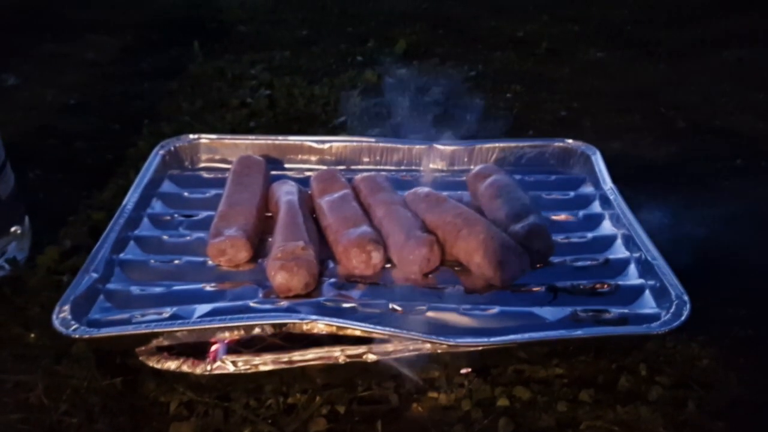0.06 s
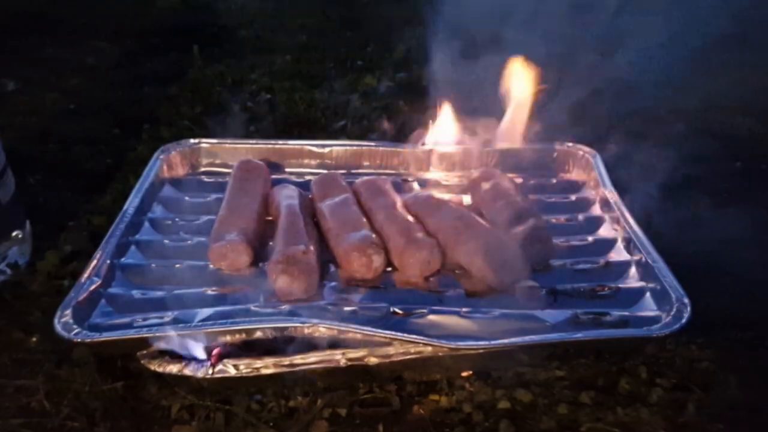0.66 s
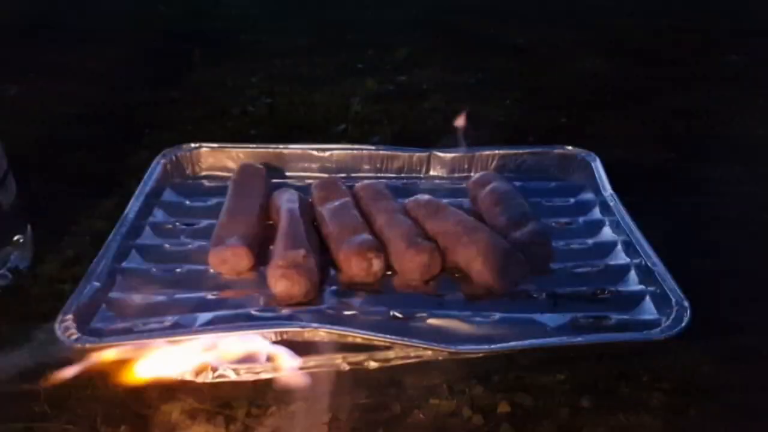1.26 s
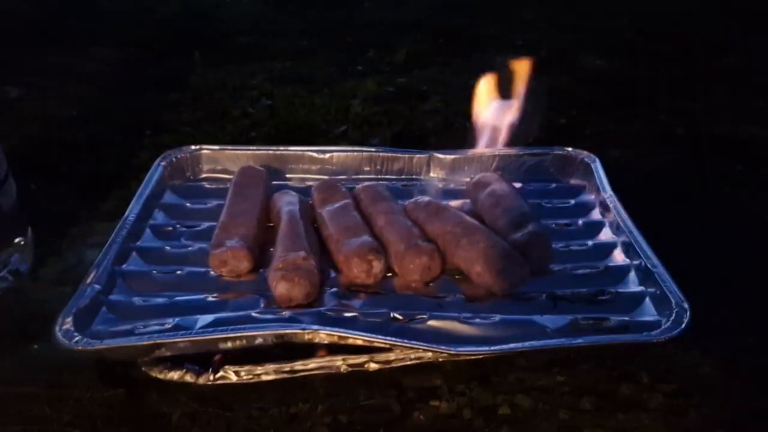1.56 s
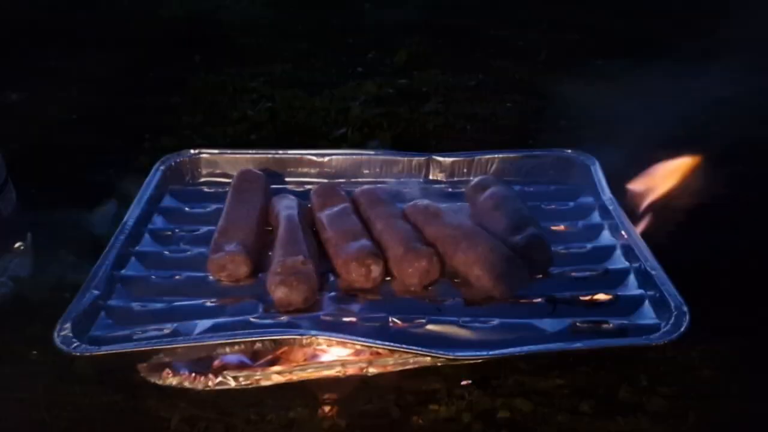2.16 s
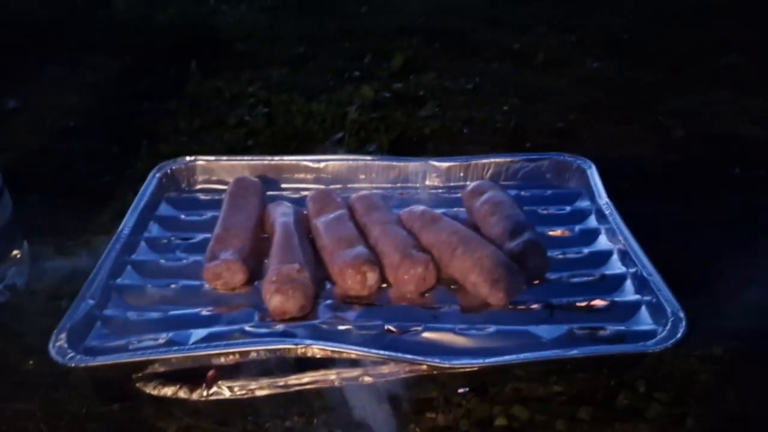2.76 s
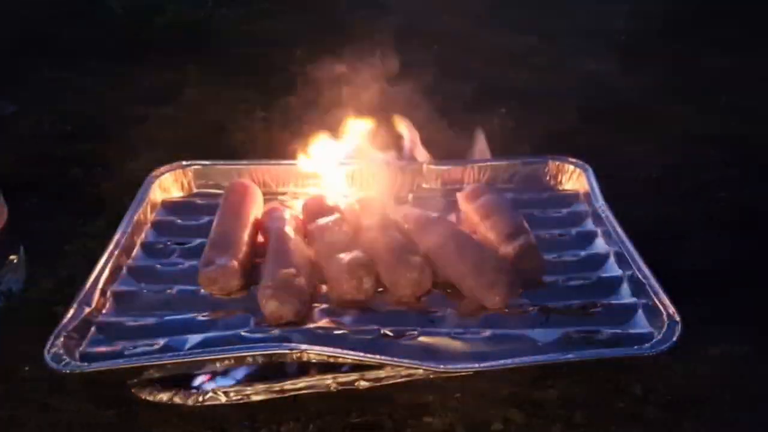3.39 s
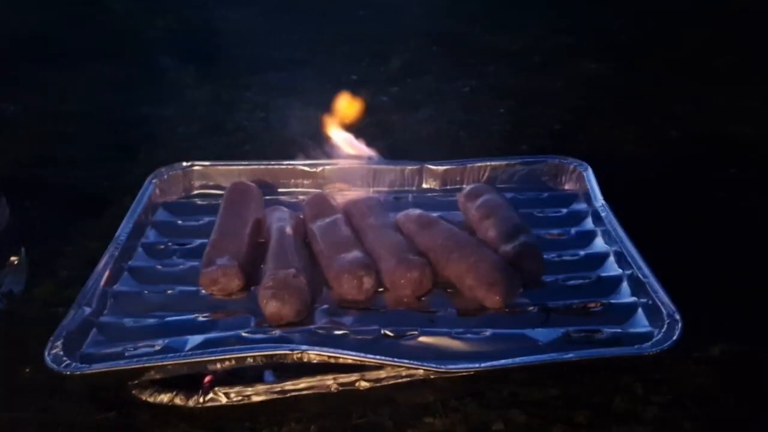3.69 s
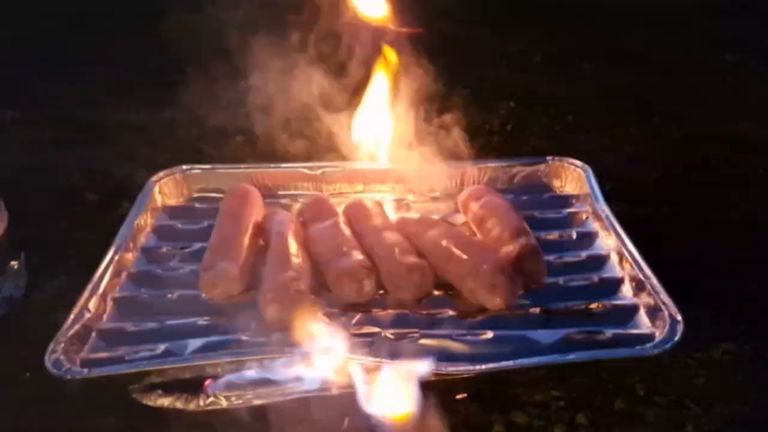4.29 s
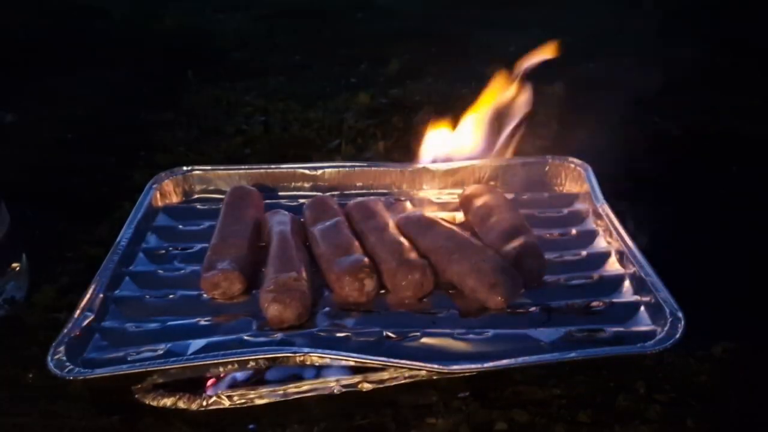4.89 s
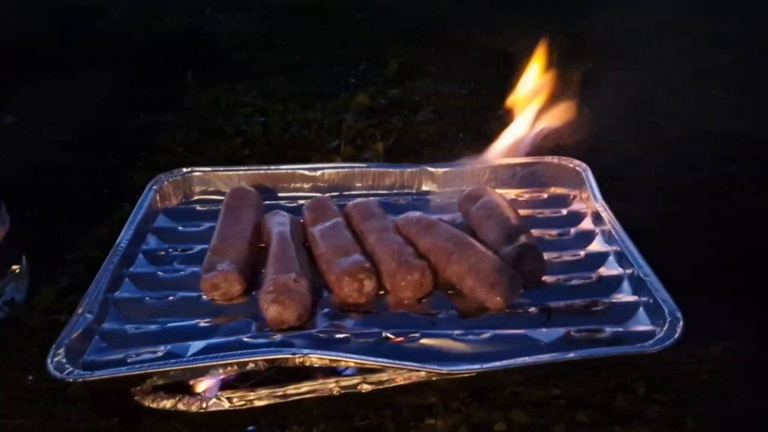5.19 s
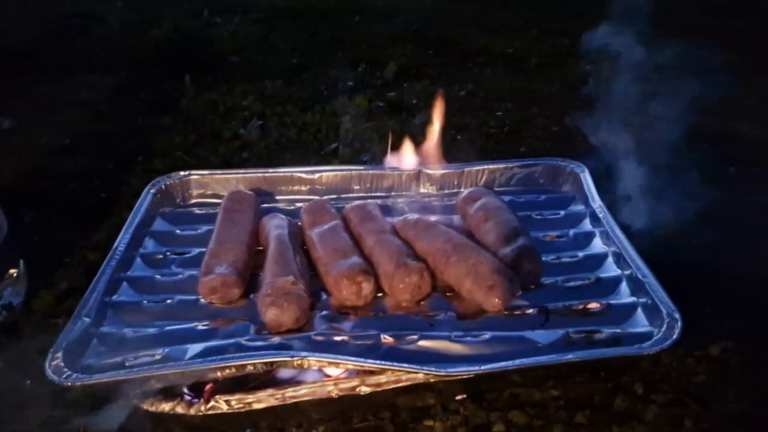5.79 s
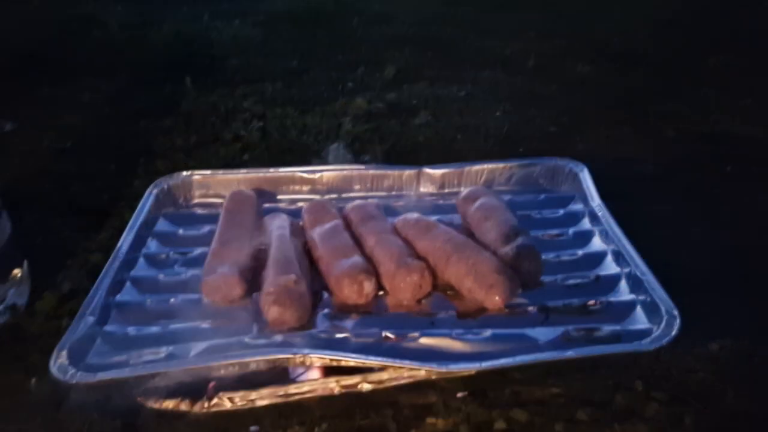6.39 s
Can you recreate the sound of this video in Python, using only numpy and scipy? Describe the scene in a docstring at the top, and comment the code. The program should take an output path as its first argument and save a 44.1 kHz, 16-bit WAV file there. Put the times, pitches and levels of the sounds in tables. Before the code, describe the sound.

Sausages sizzle on a thin foil tray over an open fire outdoors, close by and a little to the left. The fine, bright fizz runs throughout, full of tiny spits and scattered sharper pops that ring briefly off the foil, with clear ones at about 1 and 1.5 seconds. Underneath, the flames rumble, flutter and give soft low puffs, and the burning fuel cracks dryly now and then, most clearly near 0.4, 3 and 5 seconds. The biggest flare whooshes up briefly at about 1.9 seconds. The strongest puff comes at 3.4 seconds, followed by a run of smaller puffs and flaps. From 5 seconds the fat sizzles hardest, with the loudest pop at 5.5 seconds and a few more bright snaps and low puffs before the end at about 6.6 seconds.

```python
"""Sausages sizzle on a foil tray over an open fire, outdoors, close by and a little to the left.
From the start, tiny steam bubbles burst in the fat and ring the foil; now and then a big one pops.
Below, fat feeds the flames, which rumble, puff and flap, and the fuel cracks. The biggest flare
whooshes up at 1.9 s, the strongest puff comes at 3.4 s. From 5 s the fat boils hardest,
with the loudest pop at 5.5 s."""
import sys
import numpy as np
from scipy import signal
from scipy.fft import rfft, irfft, next_fast_len
from scipy.io import wavfile
from scipy.ndimage import uniform_filter1d, map_coordinates

SR = 44100
rng = np.random.default_rng(int(sys.argv[2]) if len(sys.argv) > 2 else 0)


def wav_out(sig):
    """Save sig, one row per channel (or a flat mono array), as 16-bit PCM at SR to the path in sys.argv[1]."""
    wavfile.write(sys.argv[1], SR, np.round(np.clip(np.atleast_2d(sig).T, -1, 1) * 32767).astype(np.int16))


N = 293265

# how hard the fat boils: time_s, level_db
BOIL_CURVE = [(0.0, -58.5), (0.56, -54), (0.7, -56.5), (0.84, -55.5), (1.4, -55), (1.82, -56),
              (2.04, -53.5), (2.5, -53.5), (3.12, -56), (3.36, -52), (3.49, -51.5), (3.54, -56),
              (3.63, -56), (3.8, -52), (4.3, -53.5), (4.48, -52.5), (4.7, -57), (4.96, -55), (5.05, -51),
              (5.3, -50.5), (5.58, -52), (5.8, -50.5), (6.42, -51), (6.54, -50.5), (6.64, -51)]
# strength of the fire: time_s, level_db
FIRE_CURVE = [(0.0, -46), (0.22, -52), (1.1, -47), (1.42, -47.5), (1.54, -55.5), (1.96, -52), (2.25, -49),
              (2.44, -56), (2.74, -45.5), (3.0, -56), (3.38, -45), (3.85, -47.5), (4.22, -49.5),
              (4.48, -48), (5.2, -47.5), (5.3, -52.5), (5.62, -50), (6.05, -48), (6.32, -48.5), (6.64, -51)]
# resonances of the tray's middle and the gap under it: centre_hz, width_hz, lift_db
TRAY_MODES = [(685.3, 175, 18), (800, 50, -6.5), (880, 78, 9), (1017, 80, 8), (1414, 520, 8.5),
              (1754, 170, -7), (2180, 60, 5.5), (2820, 400, 11.5), (3590, 370, 6), (4400, 77, 0),
              (6180, 330, 3), (7420, 520, 10), (8840, 860, 11.5), (9640, 350, 12)]
# resonances of the thin foil where the fat runs: centre_hz, width_hz, lift_db
FOIL_MODES = [(2570, 260, 8.5), (3660, 350, 9), (4140, 370, 4), (4430, 370, 4.5), (5620, 580, 8.5),
              (6440, 400, 4), (7480, 1000, 5.5), (9200, 1300, 5), (10300, 330, 4.5), (11650, 400, 5),
              (12600, 600, 1.5), (13900, 220, 1), (14500, 440, 2)]
# spectrum of fine bubbles: freq_hz, level_db
FIZZ_SPECTRUM = [(800, -37), (2500, -9), (4500, -3.5), (7000, -3.5), (10500, -4), (13000, 1), (15800, 0.5)]
RISE_SHARE = 0.21  # a pop's attack over its length
TOP_HZ = 15850


def sizzle():
    """Coarse bubbles simmer under the sausages, fine ones fizz on the hot foil, both in spurts."""
    # how hard the juice simmers: time_s, level_db
    juice_curve = [(0.0, -51.5), (0.27, -54.5), (0.55, -52.5), (0.72, -56), (0.95, -51.5), (1.4, -56),
                   (1.6, -54), (2.1, -52.5), (2.5, -52.5), (2.8, -52.5), (3.15, -51.5), (3.42, -51),
                   (3.65, -55.5), (4.6, -53.5), (4.92, -52), (5.5, -52), (6.64, -50.5)]
    # coarse bubbles: freq_hz, level_db
    simmer_spectrum = [(200, -49), (450, -13.5), (700, -10.5), (1200, -10), (1750, 5), (2300, -1),
                       (4000, 1.5), (6000, 2), (8500, -8.5), (15000, -24)]
    spurts_db = .5 * wobble(40)
    simmer_db = -51 + swing(juice_curve) + 0.23 * wobble(24) + spurts_db
    fizz_db = -47 + 1.31 * swing(BOIL_CURVE) + 0.59 * wobble(6.6) + spurts_db
    simmer = bubbles(simmer_spectrum, TRAY_MODES, 1200, spread_db=8.5, scatter_s=0.0092, alike_hz=2200)
    fizz = bubbles(FIZZ_SPECTRUM, FOIL_MODES, 2000, spread_db=4.0, scatter_s=0.002, alike_hz=1980)
    simmer = wander(simmer, patchy_db=2.26)
    fizz = wander(fizz, patchy_db=1.6) + amp(-12) * spits()
    return amp(simmer_db) * simmer + amp(fizz_db) * fizz


def bubbles(spectrum, modes, per_second, spread_db, scatter_s, alike_hz):
    """Random bursts of uneven size, each a brief scatter off the crinkled foil."""
    size = amp(spread_db * np.minimum(rng.standard_normal(N), 2.4))
    bursts = (rng.random(N) < per_second / SR) * size
    t = np.arange(SR // 20) / SR
    energy = np.abs(signal.fftconvolve(bursts ** 2, np.exp(-t / scatter_s))[:N])
    left, diffuse = np.sqrt(energy) * rng.standard_normal((2, N))
    # long waves scatter alike to both sides, short ones do not
    alike = lambda hz: .2 + .8 / (1 + (hz / alike_hz) ** 2)
    right = filtered(left, alike) + filtered(diffuse, lambda hz: np.sqrt(np.abs(1 - alike(hz) ** 2)))
    return unit(ring(np.array([left, right]), spectrum, modes))


def wander(x, patchy_db):
    """The bubbling shifts from spot to spot, so single resonances come and go."""
    spectra = signal.stft(x, nperseg=512)[2]
    patches = uniform_filter1d(rng.standard_normal(spectra.shape[1:]), size=3, axis=0)
    patches = uniform_filter1d(patches, size=60, axis=1)
    spectra *= amp(patchy_db * unit(patches))
    return unit(signal.istft(spectra, nperseg=512)[1][:, :N])


def spits(centre_hz=10000, spread_db=4.5, cycles=4.2, count=360):
    """Droplets spit off the foil, each a tick of a few cycles at its own pitch."""
    track, t = np.zeros((2, N)), np.arange(SR // 200) / SR
    starts_s = rng.random(count) * N / SR
    draws = np.clip(rng.standard_normal((count, 3)), -2, 2)
    for start_s, (pitch, size, turn) in zip(starts_s, draws):
        hz = min(centre_hz * np.exp(.23 * pitch), TOP_HZ)
        tone = np.sin(2 * np.pi * hz * t + np.array([[0], [2 * turn]]))
        add(track, start_s, amp(spread_db * size) * np.exp(-t * hz / cycles) * tone)
    return unit(ring(track, FIZZ_SPECTRUM, FOIL_MODES))


def pops():
    """A big bubble knocks the tray into a tinny ring, spits, and snaps brightly off the foil."""
    # big bubbles: start_s, ring_db, body_db, snap_db, length_s
    big_pops = [(0.178, -70, -60, -43, .0005), (0.222, -60, -52, -42, 0.00092),
                (0.326, -56, -53, -58, .001), (0.4116, -70, -54, -46, .0005),
                (0.443, -47.5, -47, -52, 0.0024), (0.522, -57, -45, -47, .0007),
                (0.5423, -43, -52, -52, .0015), (0.551, -57, -60, -39, .0006),
                (0.568, -57, -56, -51, .0005), (0.572, -65, -59, -42, .0005),
                (0.72, -62, -50, -48, 0.00045), (0.87, -45, -42, -43, 0.0016),
                (1.037, -37, -40.5, -50, 0.0016), (1.119, -52, -42.5, -52, 0.0034),
                (1.5018, -43, -38.5, -47, 0.0015), (1.7132, -65, -53, -47, .0005),
                (2.079, -65, -58, -42, 0.00046), (2.082, -44, -46, -58, .0015),
                (2.1384, -46, -40, -54, 0.0018), (2.324, -65, -45.5, -44, 0.00056),
                (2.364, -49, -44, -55, 0.002), (2.885, -67, -47, -56, .001), (3.045, -66, -48, -45, .0015),
                (3.094, -46.5, -46, -53, .0015), (3.21, -56, -44, -42, .0012), (3.323, -65, -58, -41, .001),
                (3.8533, -60, -46, -46, 0.0011), (4.086, -52, -45, -49, .0006),
                (4.111, -58, -44, -44, 0.0012), (4.462, -52, -48, -38, 0.0019),
                (4.9333, -45.5, -45, -50, 0.0011), (4.9956, -45, -43.5, -44, 0.0016),
                (5.4862, -36, -35, -31, 0.00083), (5.6245, -67, -55, -43, .0006),
                (5.697, -53, -46, -43, 0.0017), (5.7745, -61, -44, -52, .001),
                (6.0974, -56, -40.5, -35.5, .0006), (6.257, -60, -44, -40, .0005),
                (6.412, -57, -42, -33, .0007), (6.538, -65, -46, -38, .0006)]
    # a pop's body: freq_hz, level_db
    body_spectrum = [(200, -20), (700, -13), (1600, -4), (2300, -2.5), (2850, -3.5), (4200, 9), (6500, 0.5),
                     (12000, -13.5)]
    # its snap: freq_hz, level_db
    snap_spectrum = [(1500, -31), (4500, -12), (7000, -0.5), (9200, -6), (11000, 5.5), (13000, 3.5),
                     (15800, 5.5)]
    track = np.zeros((2, N))
    for start_s, ring_db, body_db, snap_db, length_s in big_pops + small_pops():
        tinny = ping(length_s)
        body = crack(body_spectrum, TRAY_MODES, length_s, tail_s=0.0081, tail_db=-14)
        snap = crack(snap_spectrum, FOIL_MODES, length_s, tail_s=0.005, tail_db=-20)
        add(track, start_s, amp(ring_db) * tinny + amp(body_db) * body + amp(snap_db) * snap)
    return track


def small_pops(body_db=-52, snap_db=-51, spread_db=2.2, length_s=0.00095):
    """Rows of lesser bubbles bursting at random, snapping harder as the fat boils up."""
    return [(start_s, body_db + spread_db * size, body_db + spread_db * size,
             snap_db + 0.69 * boil_db + spread_db * snap, length_s)
            for start_s, boil_db, size, snap in chance(BOIL_CURVE, count=26)]


def ping(length_s, spread_db=3.0, detune=0.005):
    """Tray modes build as the bubble tears and die fast, varying with the spot struck."""
    # tray modes under a pop: pitch_hz, level_db, t60_s
    modes = [(1450, -27, 0.014), (2283, -15, 0.026), (2805, 3, 0.013), (3160, -5, 0.011)]
    t = np.arange(SR // 20) / SR
    draws = rng.standard_normal((len(modes), 2))
    tone = sum(amp(db + spread_db * size - 60 * t / t60_s)
               * np.sin(2 * np.pi * hz * (1 + detune * pitch) * t)
               for (hz, db, t60_s), (size, pitch) in zip(modes, draws))
    attack = 1 - np.exp(-t / (RISE_SHARE * length_s))
    return burst_level(attack * tone)


def crack(spectrum, modes, length_s, tail_s, tail_db):
    """One bubble tears open and the foil chatters after it."""
    t = np.arange(SR // 20) / SR
    attack = 1 - np.exp(-t / (RISE_SHARE * length_s))
    decay = np.exp(-t / length_s) + amp(tail_db) * np.exp(-t / tail_s)
    return burst_level(ring(attack * decay * rng.standard_normal((2, len(t))), spectrum, modes))


def flames():
    """The fire rumbles deeply, its tongues flutter above that, and flares whoosh up."""
    # deep turbulence: freq_hz, level_db
    rumble_spectrum = [(10, -13), (25, -2), (45, 3.5), (70, 1.5), (110, -4), (160, -12), (260, -29),
                       (600, -37.5)]
    # flame tongues: freq_hz, level_db
    flutter_spectrum = [(50, -35), (130, 12), (200, 5.5), (260, -13), (360, 5), (480, -7.5), (900, -12.5),
                        (2500, -25)]
    fire_db = swing(FIRE_CURVE)
    rumble = amp(-50 + fire_db) * roar(rumble_spectrum, gust_db=3.5, gust_hz=24, side_db=-15.5)
    flutter = amp(-65 + 0.14 * fire_db) * roar(flutter_spectrum, gust_db=5.5, gust_hz=60, side_db=-11.5)
    return rumble * amp([[2.1], [-2.6]]) + (flutter + flares()) * amp([[1], [-1]])


def flares():
    """Flames whoosh up, each swelling and dying away evenly."""
    # flares: peak_s, length_s, level_db
    events = [(0.046, 0.22, -56), (0.595, 0.064, -57), (1.912, 0.07, -42), (2.723, 0.16, -54.5),
              (3.443, 0.19, -56), (4.3, 0.21, -58.5), (4.467, 0.13, -50.5), (4.853, 0.07, -50.5),
              (5.318, 0.067, -55.5), (6.087, 0.16, -59.5)]
    # their whoosh: freq_hz, level_db
    spectrum = [(40, -6), (90, 5.5), (140, 9.5), (200, -2), (270, -2), (370, -6), (500, -15), (900, -16),
                (2500, -59)]
    t = np.arange(N) / SR
    swell = sum(amp(db) * np.exp(-(2 * (t - peak_s) / length_s) ** 2) for peak_s, length_s, db in events)
    return swell * roar(spectrum, gust_db=4.5, gust_hz=190, side_db=-13.0)


def roar(spectrum, gust_db, gust_hz, side_db):
    """Turbulent low noise of rms 1, nearly alike left and right."""
    mid, side = unit(filtered(rng.standard_normal((2, N)), lambda hz: amp(along(spectrum, hz))))
    side = amp(side_db) * side
    return unit(amp(gust_db * wobble(gust_hz)) * np.array([mid + side, mid - side]))


def puffs(cycles=0.57):
    """Fat vapour catches fire: a push of air and a suck, a cycle or two long."""
    # ignitions: peak_s, level_db, pitch_hz
    events = [(0.307, -34.5, 68), (.476, -42, 92), (0.622, -38, 77), (0.749, -36.5, 84), (.948, -29, 92),
              (1.934, -36, 94), (2.168, -40, 65), (2.312, -45, 85), (2.8, -35, 86), (3.336, -32.5, 81),
              (3.363, -24, 81), (3.436, -37, 64), (3.491, -33, 96.5), (3.54, -36, 82), (3.575, -35, 90),
              (3.671, -40, 66), (3.742, -32, 49.7), (3.943, -41, 66.5), (4.039, -31.5, 66),
              (4.392, -36, 82), (4.471, -32, 80), (4.507, -29.5, 76.5), (4.616, -39, 78), (4.652, -37, 73),
              (4.722, -38, 73.4), (4.803, -35, 87), (4.985, -35.5, 65), (5.072, -40, 95),
              (5.157, -36.5, 76.6), (5.702, -40, 64), (6.019, -36, 87), (6.154, -29, 67.6),
              (6.226, -29.5, 62.5), (6.396, -33, 70.4)]
    track, t = np.zeros(N), np.arange(-SR // 20, SR // 20) / SR
    for peak_s, db, hz in events:
        envelope = np.exp(-(t * hz / cycles) ** 2)
        add(track, peak_s + t[0], -amp(db) * envelope * np.cos(2 * np.pi * hz * t))
    return track * amp([[2.3], [-4.5]])


def flaps(dip_gain_db=6.0, low_cut_hz=130, eddy_gain_db=-11.0, eddy_s=0.0081):
    """A flame tongue collapses: a pressure dip inside a brief eddy; narrower dips sound brighter."""
    # tongues snapping off: peak_s, level_db, brightness_hz
    big_flaps = [(0.301, -42.5, 180), (0.58, -45, 160), (0.923, -43, 170), (1.281, -43, 200),
                 (1.905, -40, 180), (2.135, -40, 340), (2.3, -43, 400), (2.314, -46, 220),
                 (3.256, -53, 160), (3.383, -41, 160), (3.532, -51, 150), (4.129, -44.5, 200),
                 (4.205, -43, 232), (4.258, -43, 320), (4.309, -39.5, 210), (4.391, -41, 180),
                 (4.45, -38, 140), (4.463, -38.5, 220), (4.838, -42, 170), (4.942, -46, 180),
                 (5.484, -43.5, 130), (5.811, -46, 200), (6.142, -44, 150)]
    # eddy round a flap: freq_hz, level_db
    eddy_spectrum = [(60, -13), (140, 1), (280, 4), (400, -5), (520, -13.5), (750, -7), (1100, -26),
                     (2500, -28)]
    dips, eddies = np.zeros((2, N))
    t = np.arange(-SR // 20, SR // 20) / SR
    for peak_s, db, hz in big_flaps + small_flaps():
        add(dips, peak_s + t[0], -amp(db + dip_gain_db) / (1 + (2 * np.pi * hz * t) ** 2))
        add(eddies, peak_s + t[0], amp(db + eddy_gain_db) * np.exp(-(t / eddy_s) ** 2))
    # a small flame radiates no deep bass
    dips = filtered(dips, lambda hz: 1j * hz / (low_cut_hz + 1j * hz))
    swirl = roar(eddy_spectrum, gust_db=2.0, gust_hz=180, side_db=-9)
    return (dips + eddies * swirl) * amp([[1], [-1]])


def small_flaps(level_db=-52.5, centre_hz=135, spread_db=1.3, spread_octaves=.22):
    """Rows of little tongues snapping off at random, harder in a strong fire."""
    return [(peak_s, level_db + 0.82 * fire_db + spread_db * size,
             centre_hz * 2 ** (spread_octaves * pitch))
            for peak_s, fire_db, size, pitch in chance(FIRE_CURVE, count=64)]


def embers(gain_db=-4.0, cycles=2.25, rough=0.23):
    """Fuel splits in the heat: a dry tock, gone within a few cycles."""
    # cracks in the fuel: start_s, level_db, pitch_hz
    events = [(0.4434, -31, 1370), (1.06, -41, 746), (1.786, -37.5, 950), (2.137, -34.5, 910),
              (2.296, -36, 1150), (3.0478, -29.5, 1450), (3.0943, -34, 2110), (4.9931, -38.5, 780),
              (4.9947, -29.5, 1430)]
    track, t = np.zeros(N), np.arange(SR // 40) / SR
    for start_s, db, hz in events:
        grit = uniform_filter1d(rng.standard_normal(len(t)), size=5)
        tock = np.sin(2 * np.pi * hz * t) + rough * grit
        add(track, start_s, amp(db + gain_db) * tock * np.exp(-t * hz / cycles))
    return track


def draught(level_db=-63):
    """Hot air rushes through the gap under the tray."""
    # rushing air: freq_hz, level_db
    spectrum = [(150, -32), (330, 10), (500, -9), (700, -11), (1050, -1), (1500, 0), (2100, 8), (4000, -45)]
    air = rng.standard_normal(N) + amp(-16.5) * rng.standard_normal((2, N))
    return amp(level_db + 3.3 * wobble(15)) * unit(ring(air, spectrum, TRAY_MODES))


def microphones(x):
    """The right microphone faces away from the tray and hears it later and duller."""
    # right against left: freq_hz, gain_db
    shadow = [(300, -5), (1050, -1), (1450, -3), (2000, -2.5), (2450, -4.5), (2820, -23), (3200, -1.5),
              (3600, -9.5), (4900, -1), (7300, -8), (8200, -2), (9300, -23), (11000, -8), (12200, -12),
              (15500, -13.5)]
    # longer way round to the right: freq_hz, delay_s
    lag = [(400, 0.0003), (700, 0.00018), (1100, 0.00022), (2000, 0.00028), (2600, 0.00039),
           (4000, 0.000473)]
    far_side = lambda hz: amp(along(shadow, hz)) * np.exp(-2j * np.pi * hz * along(lag, hz))
    return np.array([x[0], filtered(x[1], far_side)])


def ring(x, spectrum, modes, size=2048):
    """x coloured by a spectrum and rung through resonances, at minimum phase."""
    hz = np.fft.rfftfreq(size, 1 / SR)
    peaks_db = sum(lift_db / (1 + (2 * (hz - centre_hz) / width_hz) ** 2)
                   for centre_hz, width_hz, lift_db in modes)
    cepstrum = irfft(np.log(amp(along(spectrum, hz) + peaks_db)))
    causal = cepstrum * (1 + np.sign(np.fft.fftfreq(size)))
    response = irfft(np.exp(rfft(causal)))
    return signal.fftconvolve(x, response[None], axes=1)[:, :x.shape[1]]


def filtered(x, response):
    """x through a complex frequency response."""
    size = next_fast_len(N + SR // 2)
    return irfft(rfft(x, size) * response(np.fft.rfftfreq(size, 1 / SR)), size)[..., :N]


def chance(curve, count):
    """Unevenly spread moments: time_s, swing_db of the curve, two clipped normal draws."""
    jitter, *draws = rng.standard_normal((count, 3)).T
    time_s = (np.arange(count) + jitter % 1) / count * (N - 1) / SR
    return zip(time_s, swing(curve)[(time_s * SR).astype(int)], *np.clip(draws, -2, 2))


def swing(curve):
    """A level curve in dB above its mean, per sample."""
    db = np.interp(np.arange(N) / SR, *np.transpose(curve))
    return db - db.mean()


def wobble(rate_hz):
    """A smooth random curve, rate_hz knots a second."""
    knots = rng.standard_normal(int(N * rate_hz / SR) + 4)
    return map_coordinates(knots, [np.arange(N) * rate_hz / SR])


def along(points, hz):
    """Rows of freq_hz, value read on a log axis."""
    freq_hz, values = np.transpose(points)
    return np.interp(np.log(hz + 1), np.log(freq_hz + 1), values)


def add(track, start_s, sound):
    """Mix a sound into the track."""
    part = track[..., max(round(start_s * SR), 0):][..., :sound.shape[-1]]
    part += sound[..., :part.shape[-1]]


def burst_level(x):
    """x with the energy of 6 ms at rms 1."""
    return np.sqrt(.006 * SR) * x / np.linalg.norm(x, axis=-1, keepdims=True)


def unit(x):
    """x at rms 1."""
    return x / np.sqrt(np.mean(x ** 2) + 1e-20)


def amp(db):
    """Decibels to gain."""
    return 10 ** (np.asarray(db) / 20)


def scene():
    """The sizzling tray above, the fire below."""
    return microphones(sizzle() + pops() + draught() + embers()) + flames() + puffs() + flaps()


def record(dry):
    """Band limit: nothing above TOP_HZ passes."""
    return filtered(dry, lambda hz: hz < TOP_HZ)


dry = scene()
out = record(dry)
wav_out(out)
```